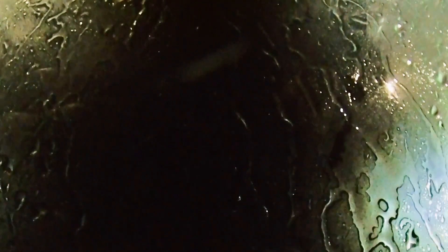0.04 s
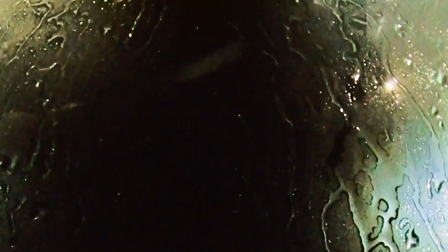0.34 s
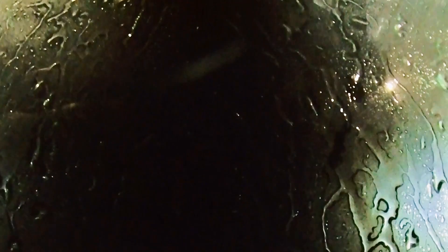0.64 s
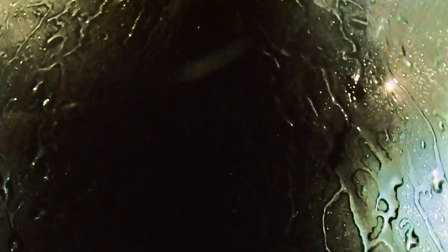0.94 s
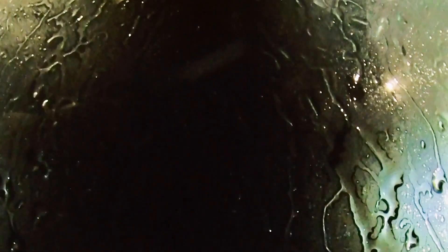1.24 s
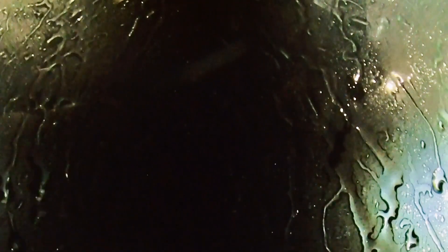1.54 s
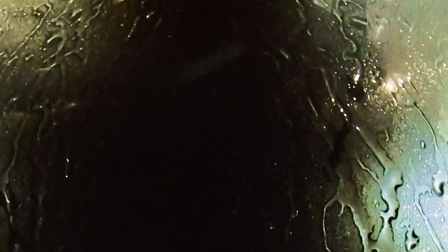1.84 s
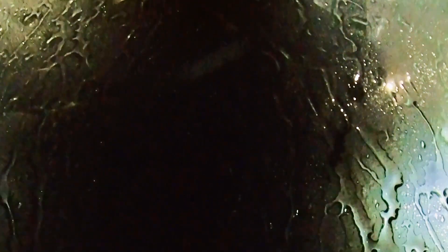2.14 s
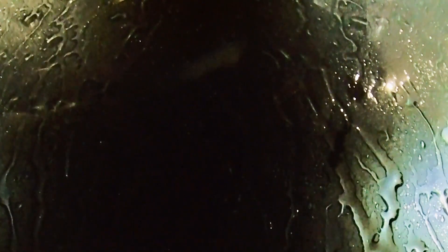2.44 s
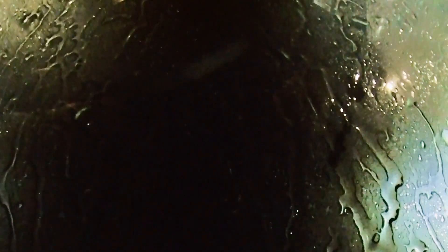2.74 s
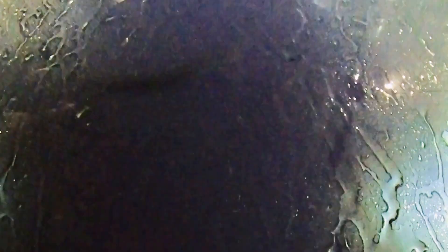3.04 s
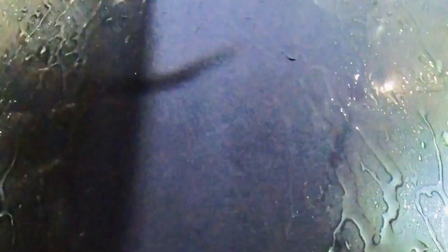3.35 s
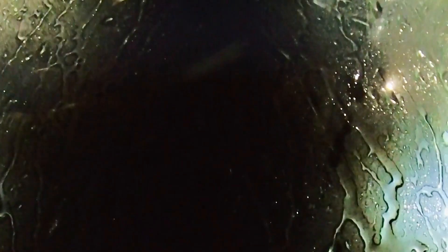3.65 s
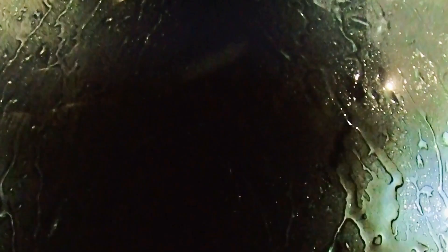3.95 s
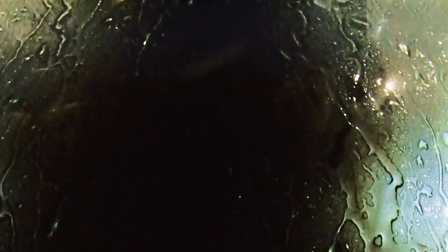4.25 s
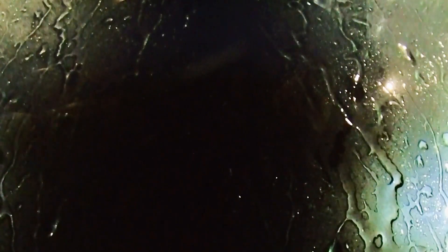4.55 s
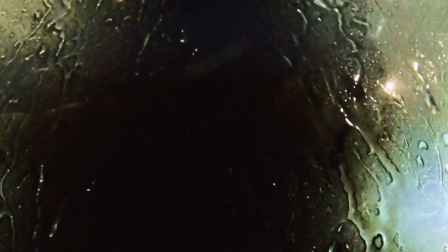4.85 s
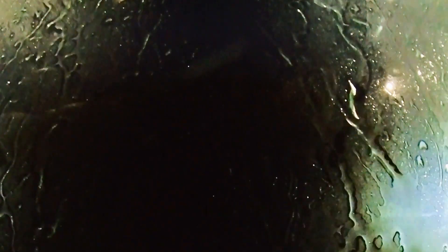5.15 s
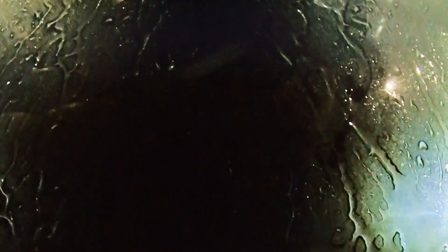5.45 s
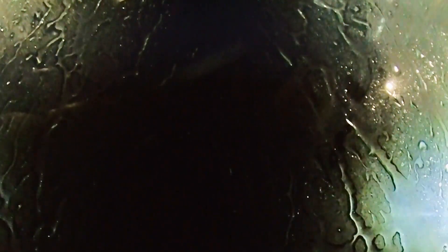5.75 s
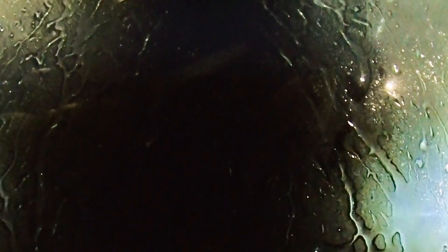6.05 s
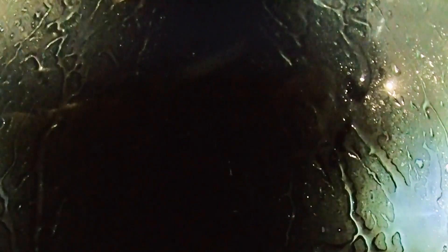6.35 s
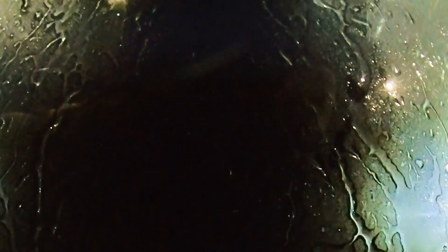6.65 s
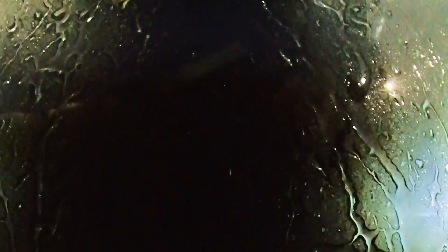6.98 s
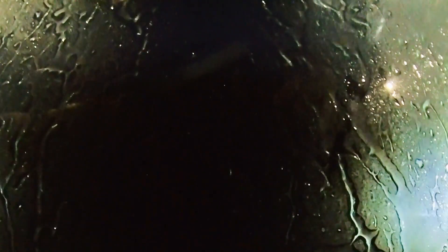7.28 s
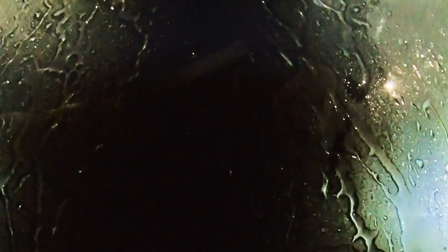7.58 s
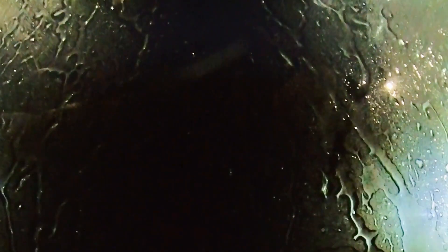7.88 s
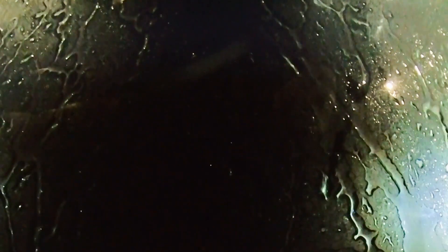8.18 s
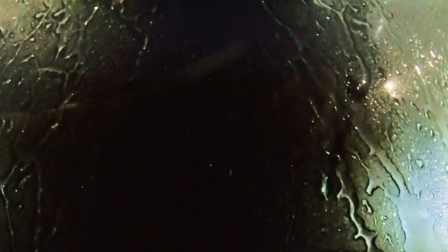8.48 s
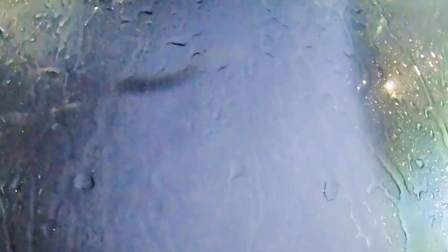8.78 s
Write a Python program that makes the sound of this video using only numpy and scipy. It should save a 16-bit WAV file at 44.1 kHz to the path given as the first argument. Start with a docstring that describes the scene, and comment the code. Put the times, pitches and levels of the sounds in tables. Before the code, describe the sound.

Steady rain is heard from inside a room, close to a window: a soft wash outside, a fine patter and single drops knocking on the glass. After about a second, distant thunder starts a long, low roll and fades. A second roll follows, nearer and louder, with dull claps and thuds. An appliance hums low underneath the whole time.

```python
"""Distant thunder rolls through night rain in two long waves, heard from behind a window.
Shock fronts from along the lightning channel merge into boom, roll and growl; the second wave is nearer,
with claps and more thuds, and a mode of the room booms along. Single drops knock and splash on the pane
amid a fine patter, far rain on roof and ground blurs into a steady wash, and an appliance hums low."""
import sys
import numpy as np
from scipy import signal
from scipy.fft import rfft, irfft, next_fast_len
from scipy.io import wavfile
from scipy.ndimage import map_coordinates

SR = 44100
rng = np.random.default_rng(int(sys.argv[2]) if len(sys.argv) > 2 else 0)


def transcribe(u):
    """Save the signal u as a 16-bit wav file named by the first command-line argument.

    u: samples, shape (n,) or (channels, n), limited to [-1, 1]; the rate is SR.
    q: integer samples, one column per channel.
    """
    v = np.clip(np.atleast_2d(u).T, -1, 1)
    q = np.round(v * 32767).astype(np.int16)
    wavfile.write(sys.argv[1], SR, q)


N = 397782
TIME = np.arange(N) / SR


def amp(db):
    """Decibels to gain."""
    return 10 ** (np.asarray(db) / 20)


def unit(x):
    """x at rms 1."""
    return x / np.sqrt(np.mean(x ** 2) + 1e-20)


def along(points, hz):
    """Read (frequency, value) points on a log frequency axis."""
    freqs, values = np.transpose(points)
    return np.interp(np.log(hz + 1), np.log(freqs + 1), values)


def curves(rows):
    """One automation curve for each column after the time."""
    times, *columns = np.transpose(rows)
    return [np.interp(TIME, times, column) for column in columns]


def wobble(rate):
    """A smooth random curve, rate knots a second."""
    return map_coordinates(rng.standard_normal(int(N * rate / SR) + 4), [TIME * rate])


def filtered(x, response):
    """x through a filter given as a function of frequency."""
    size = x.shape[-1]
    padded = next_fast_len(size + SR // 2)
    return irfft(rfft(x, padded) * response(np.fft.rfftfreq(padded, 1 / SR)), padded)[..., :size]


def coloured(x, spectrum):
    """x through a causal EQ that falls 60 dB an octave past its last point, brought to rms 1."""
    def minimum_phase(hz):
        db = along(spectrum, hz) - 60 * np.log2(np.maximum(hz / spectrum[-1][0], 1))
        cepstrum = irfft(np.log(amp(db) + 1e-6))
        half = len(cepstrum) // 2
        cepstrum[1:half] *= 2
        cepstrum[half + 1:] = 0
        return np.exp(rfft(cepstrum))
    return unit(filtered(x, minimum_phase))


def impacts(rate, spread_db):
    """Randomly timed impulses, rate a second, scattered in size by spread_db; rms 1."""
    size = amp(spread_db * np.clip(rng.standard_normal(N), -2, 2)) * rng.choice([-1, 1], N)
    return unit(size * (rng.random(N) < rate / SR))


def add(track, start_s, sound):
    """Mix a sound into the track at start_s."""
    part = track[max(round(start_s * SR), 0):][:len(sound)]
    part += sound[:len(part)]


def rumble(spectrum, rate, swell_s):
    """Shock fronts from along the lightning channel, dulled by distance; levelled over swell_s."""
    fronts = coloured(impacts(rate, spread_db=3.0), spectrum)
    window = signal.windows.hann(int(2 * swell_s * SR))
    power = signal.fftconvolve(fronts ** 2, window / window.sum(), "same")
    return fronts / np.sqrt(np.abs(power) + 0.041)


# Peal cues, one for each stretch of the lightning channel:
# (start [s], rise [s], hold [s], roll level [dB], boom over roll [dB], growl over roll before trim [dB])
PEAL_CUES = [(1.347, 0.063, 0.14, -42.5, -13, 1), (1.465, 0.22, 0.1, -38.5, 9, -4),
             (1.802, 0.05, 0.11, -40.5, 8, 4), (2.042, 0.051, 0.037, -37.5, -0.5, -3.5),
             (2.436, 0.051, 0.21, -50, 18, 8.5), (2.67, 0.23, 0.39, -33.5, 1, -5.5),
             (3.19, 0.13, 0.13, -36.5, 5.5, -2), (3.534, 0.068, 0.11, -42, 3.5, -7.5),
             (3.884, 0.055, 0.13, -35, -2, -4.5), (4.178, 0.064, 0.17, -38.5, 9.5, 0),
             (4.67, 0.13, 0.065, -55, 11.5, 6.5), (5.734, 0.2, 0.19, -28.5, -2.5, -6.5),
             (6.224, 0.032, 0.22, -30.5, -6.5, -2.5), (6.5, .18, 0.18, -28, -3.5, -3.5),
             (7.006, 0.05, .06, -39, 3.5, 6), (7.11, 0.044, 0.04, -34.5, -6, -4),
             (7.252, 0.023, 0.015, -35.5, 0, 0.5), (7.473, 0.054, 0.08, -36, -3.5, -2),
             (7.785, 0.012, 0.033, -31, 0.5, -2), (7.944, 0.024, 0.14, -39, 0.5, 2.5),
             (8.124, 0.033, 0.24, -40.5, -7, 1), (8.441, 0.022, 0.047, -27.5, -2.5, -2),
             (8.534, 0.028, 0.091, -33, 1.5, -0.5), (8.73, 0.025, 0.037, -35, -15, -1),
             (8.985, 0.067, 0.046, -41.5, -4, 16)]


def peal_envelopes():
    """Gains of roll, boom and growl: each peal swells, holds and dies into its echo off the land."""
    release_s, echo_s, echo_db = 0.64, 4.3, -6  # both times are for a 60 dB fall
    power = np.zeros((3, N))
    for start_s, rise_s, hold_s, db, boom_db, growl_db in PEAL_CUES:
        age = np.maximum(TIME - start_s - rise_s - hold_s, 0)
        fade = amp(-60 * age / release_s) + amp(echo_db - 60 * age / echo_s)
        envelope = np.clip((TIME - start_s) / rise_s, 0, 1) * fade / (1 + amp(echo_db))
        power += (amp([[db], [db + boom_db], [db + growl_db]]) * envelope) ** 2
    return np.sqrt(power)


# The thunder's sub boom, low roll and low-mid growl: (frequency [Hz], level [dB])
BOOM_EQ = [(15, -31), (25, -19), (33, -21.5), (41, 3), (47, -6.5), (56, 3.5), (68, -7), (85, -16.5),
           (120, -45.5), (200, -69.5)]
ROLL_EQ = [(45, -40.5), (75, -18), (92, -1), (106, -7), (128, -1.5), (145, -3.5), (163, -1), (182, -6),
           (205, -5), (235, -16.5), (320, -31.5), (500, -80)]
GROWL_EQ = [(120, -50), (200, -15.5), (240, 1.5), (280, 5), (305, 2), (335, -4), (390, -4.5), (480, -16),
            (650, -28.5), (1200, -54.5)]


def thunder(roll, boom, growl):
    """Far parts of the channel boom, nearer parts roll and growl; claps and thuds add the accents."""
    peals = boom * rumble(BOOM_EQ, rate=400, swell_s=0.041)
    peals += roll * rumble(ROLL_EQ, rate=900, swell_s=0.027)
    peals += amp(-4.0) * growl * rumble(GROWL_EQ, rate=600, swell_s=0.033)
    return peals + claps() + thuds()


# Volleys from the nearest stretches of the channel: (start [s], rise [s], hold [s], level [dB])
CLAP_CUES = [(5.955, 0.013, 0.22, -38.5), (6.271, 0.018, 0.012, -31.5), (6.34, 0.019, 0.033, -36),
             (6.742, 0.023, 0.029, -34.5), (7, 0.012, 0.027, -38), (7.13, 0.023, .03, -38),
             (7.777, .012, .035, -36), (8.55, 0.015, 0.032, -44)]
# Their midrange crack: (frequency [Hz], level [dB])
CLAP_EQ = [(150, -30.5), (270, -1), (340, 7), (400, -1), (455, 0), (560, -11.5), (900, -36.5)]


def claps():
    """The nearest fronts keep their upper range and arrive in dense volleys with a fast attack."""
    release_s = 0.2  # to fall 60 dB
    power = np.zeros(N)
    for start_s, rise_s, hold_s, db in CLAP_CUES:
        attack = np.clip((TIME - start_s) / rise_s, 0, 1)
        age = np.maximum(TIME - start_s - rise_s - hold_s, 0)
        power += (attack * amp(db - 60 * age / release_s)) ** 2
    return np.sqrt(power) * rumble(CLAP_EQ, rate=1200, swell_s=0.017)


# Low pitched thuds in the thunder; the first two are soft booms of the room ringing:
# (start [s], peak level [dB], pitch [Hz], rise [s])
THUD_CUES = [(1.36, -32.5, 156, 0.036), (1.51, -32, 165.6, 0.041), (1.645, -31, 245, 0.024),
             (2.11, -29, 119, 0.021), (2.938, -21.5, 160.6, 0.019), (3.28, -24.5, 47, 0.051),
             (4.0, -26.5, 119, 0.023), (4.26, -27.5, 50, 0.05), (4.371, -25, 59, 0.026),
             (5.918, -25, 136.3, 0.02), (5.994, -21, 139, 0.009), (6.028, -19.5, 134, 0.016),
             (6.157, -26, 174.4, 0.016), (6.25, -26.5, 74, 0.014), (6.287, -27, 345, 0.0097),
             (6.355, -28, 336, 0.022), (6.662, -21, 185, 0.0097), (6.728, -19.5, 199.4, 0.016),
             (6.737, -22.5, 125, 0.023), (6.832, -19, 208, 0.016), (6.84, -21.5, 129.4, 0.022),
             (7.15, -24.5, 149, 0.015), (7.26, -22.5, 89, 0.01), (7.803, -24, 112, 0.0069),
             (7.813, -25, 266, 0.009), (7.856, -29, 74, 0.009), (7.965, -31, 157, 0.013),
             (8.048, -24, 166, 0.013), (8.281, -23.5, 183, 0.0089), (8.464, -22.5, 250, 0.012),
             (8.475, -19, 153, 0.012), (8.508, -20, 137, 0.014), (8.566, -20.5, 286, 0.014),
             (8.592, -22.5, 110.5, 0.017), (8.667, -17, 168, 0.015), (8.708, -24.5, 171, 0.016)]


def thuds():
    """Each thud swells and dies within a few cycles, sinking in pitch, with a short trail of echoes."""
    pitch_sag, trail_db, trail_s = 0.068, -10, 0.072
    out, t = np.zeros(N), np.arange(SR // 3) / SR
    for start_s, db, hz, rise_s in THUD_CUES:
        age = t / rise_s
        turns = np.cumsum(hz * np.exp(pitch_sag * np.tanh(1 - age))) / SR + rng.random()
        knock = (age * np.exp(1 - age)) ** 2 * np.sin(2 * np.pi * turns)
        echoes = rng.standard_normal(len(t)) * amp(-60 * t / trail_s)
        trail = coloured(echoes, [(hz / 4, -20), (hz, 0), (2 * hz, -12)])
        add(out, start_s, amp(db) * (knock + amp(trail_db) * trail / np.abs(trail).max()))
    return out


def room_ring(roll):
    """A narrow standing wave of the room booms along with the roll; later peals ring it less."""
    mode_hz, first_peal_db, fall_db_per_s = 162.8, 3.5, 3.5
    send_db = first_peal_db - fall_db_per_s * (TIME - PEAL_CUES[0][0])
    mode = [(mode_hz * ratio, db) for ratio, db in ((.7, -40), (.9, -10), (1, 0), (1.1, -10), (1.4, -40))]
    return roll * amp(send_db) * rumble(mode, rate=210, swell_s=0.034)


# Big drops on the pane; knock and ping are offsets from the level, all before the trims and EQ:
# (time [s], level [dB], splash length [s], knock [dB], ping [dB], ping pitch [Hz])
DROP_CUES = [(0.9365, -48, .05, 13, -2, 6000), (1.214, -45, 0.091, -12, -2, 5450),
             (1.397, -50, .03, 5, -1, 5380), (2.22, -52, 0.026, 1, -2, 4840),
             (2.358, -51, .05, 4, -7, 3220), (2.376, -46, .09, 2, -12, 3630),
             (3.382, -41, 0.088, 11.5, -8, 5400), (3.414, -44, .07, 8, -5.5, 5350),
             (3.431, -47, 0.045, 15, -9, 5350), (3.472, -47, 0.044, -6, -2.5, 3800),
             (4.069, -46.5, .05, 8, -2.5, 4800), (4.555, -51, .04, 3, -1, 5660),
             (4.575, -47, .04, 3, -5, 5460), (5.7447, -42, .055, -2, -5, 3550),
             (6.1493, -46.5, .07, 15, -5, 5950), (6.568, -45, .09, 12, -7, 5850),
             (6.591, -43.5, .055, 5, -5, 4600), (6.619, -51, .04, 6, -4, 4610),
             (6.689, -47, 0.05, 3, -8, 5250), (6.946, -45, .09, 9, -6, 3350),
             (7.073, -47, 0.038, 13, -2, 4750), (7.418, -44.5, 0.083, 4, -8.5, 6330),
             (7.463, -42, 0.064, 8, -11, 4650), (7.817, -44.5, 0.044, 5, -2, 5600),
             (8.058, -38.5, .07, 7.5, -5.5, 6150), (8.137, -47, 0.078, 0, -3.5, 5900),
             (8.186, -45, .012, 0, -4, 5500), (8.279, -50, .03, -2, 7.5, 4930)]
# Resonances of the pane: (frequency [Hz], bandwidth [Hz], level [dB])
PANE_MODES = [(1028, 33, 3.5), (1380, 330, -9), (2060, 63, -16), (2410, 110, -25.5), (2950, 360, -19)]
# The bright splash, and the glass dulling the whole drop: (frequency [Hz], level [dB])
SPLASH_EQ = [(1000, -5), (2500, 6.5), (4000, 1), (5200, 6), (6600, 3.5), (7500, -6), (8500, -14),
             (9700, -24)]
THROUGH_GLASS_EQ = [(6500, -1.5), (8000, -0.5), (9600, -14)]


def drops():
    """A big drop knocks the glass and bursts into a short splash with a ping of its own pitch."""
    flatten_s, knock_s, ping_band_hz = 0.0028, 0.082, 1500
    out, t = np.zeros(N), np.arange(SR // 6) / SR

    def burst(decay_s):
        attack = 1 - np.exp(-t / flatten_s)
        return rng.standard_normal(len(t)) * attack * amp(-60 * (t / decay_s) ** 1.5)

    def resonance(hz, centre, width):
        return 1j * hz * width / (centre ** 2 - hz ** 2 + 1j * hz * width)

    def pane(hz):
        return sum((-1) ** k * amp(db) * resonance(hz, centre, width)
                   for k, (centre, width, db) in enumerate(PANE_MODES))

    for start_s, db, length_s, knock_db, ping_db, ping_hz in DROP_CUES:
        splash = coloured(burst(length_s), SPLASH_EQ)
        knock = filtered(burst(knock_s), pane)
        ping = filtered(burst(0.7 * length_s), lambda hz: resonance(hz, ping_hz, ping_band_hz) ** 3)
        for part, part_db in ((splash, -2.5), (knock, knock_db - 7.0), (ping, ping_db)):
            add(out, start_s, amp(db + part_db) * part / np.abs(part).max())
    return filtered(out, lambda hz: amp(along(THROUGH_GLASS_EQ, hz)))


# Tone of the smaller drops: (frequency [Hz], level [dB])
TAP_EQ = [(500, -7), (1000, 6), (2000, 3.5), (3000, 7), (4400, 0.5), (6500, 0), (7500, -10.5), (9500, -31)]


def taps():
    """Smaller drops splash on the pane in random clusters, each a short puff of noise."""
    taps_per_s, rise_s, decay_s = 55, 0.0036, 0.018
    crowding = amp(3 * wobble(9))
    hits = rng.random(N) < taps_per_s * crowding / crowding.mean() / SR
    sizes = hits * rng.random(N)
    t = np.arange(SR // 8) / SR
    envelope = np.exp(-t / decay_s) * (1 - np.exp(-t / rise_s))
    power = signal.fftconvolve(sizes ** 2, envelope ** 2)[:N]
    return amp(-65) * coloured(np.sqrt(np.abs(power)) * rng.standard_normal(N), TAP_EQ)


def drips(rate, centre_hz, spread, cycles, spread_db):
    """Small drops on wet surfaces: each rings briefly at its own pitch."""
    count = int(rate * N / SR)
    when, start_turn = rng.random((count, 2)).T
    pitch, life, size = np.clip(rng.standard_normal((count, 3)), -2, 2).T
    hz = np.minimum(centre_hz * np.exp(spread * pitch), SR / 3)[:, None]
    samples = np.arange(SR // 60)
    turns = hz * samples / SR
    age = turns / (cycles * np.exp(life / 2))[:, None]
    envelopes = amp(spread_db * size)[:, None] * np.exp(-age) * (1 - np.exp(-10 * age))
    rings = envelopes * np.sin(2 * np.pi * (turns + start_turn[:, None]))
    positions = (when * N).astype(int)[:, None] + samples
    return unit(np.bincount(positions.ravel(), rings.ravel(), N)[:N])


# Strength of the rain, before each layer's trim: (time [s], wash level [dB], patter level [dB])
RAIN_FADERS = [(0, -48.5, -60.5), (1.3, -50.5, -64), (3.3, -48.5, -62), (5.2, -49, -61), (7.4, -47, -61.5),
               (9, -49, -61.5)]
# Pitches that the wet pane favours: (pitch [Hz], level within the patter [dB])
PANE_TINKS = [(2880, -17.5), (4700, -17), (5300, -14.5), (6350, -14)]
# Sizzle of the near rain: (frequency [Hz], level [dB])
PATTER_EQ = [(800, -10.5), (2000, -2.5), (3100, -2.5), (3700, -4.5), (4400, -6.5), (5200, -5.5),
             (5750, -4.5), (6350, -4), (6900, -4), (7400, -10.5), (8200, -19), (9000, -26.5), (9700, -37.5)]


def patter(flurry_db):
    """Near drops tick and ping on the wet pane and sill over a fine spray."""
    _, level_db = curves(RAIN_FADERS)
    pings = drips(rate=900, centre_hz=5500, spread=.22, cycles=16, spread_db=2.4)
    tinks = sum(amp(db) * drips(rate=130, centre_hz=hz, spread=.025, cycles=30, spread_db=2.4)
                for hz, db in PANE_TINKS)
    ticks = impacts(450, spread_db=3.5)
    spray = impacts(9000, spread_db=2)
    fizz = tinks + .52 * pings + .33 * ticks + .8 * spray
    return amp(level_db + 0.57 + flurry_db) * coloured(fizz, PATTER_EQ)


# Far rain through the wall, its low drumming and its watery mids: (frequency [Hz], level [dB])
DRUMMING_EQ = [(18, -23), (30, -6.5), (45, 5), (72, 1.5), (92, -0.5), (120, 1), (165, 3), (200, 0.5),
               (270, -1), (295, -5.5), (345, -1), (430, -8.5), (500, -5.5), (800, -37.5)]
WASH_EQ = [(250, -23), (420, 0.5), (520, 4.5), (680, 4.5), (920, 0), (1035, 2), (1140, -7.5), (1350, -5),
           (1600, -8), (2000, -15), (2350, -14.5), (2650, -18.5), (2880, -17), (3600, -27.5)]


def wash():
    """Countless far drops drum on roof and ground and merge into a wash; nearer ones plop through it."""
    level_db, _ = curves(RAIN_FADERS)
    drumming = amp(-40.5 + 0.56 * wobble(6.7)) * coloured(impacts(2500, spread_db=2.5), DRUMMING_EQ)
    plops = drips(rate=700, centre_hz=2000, spread=.35, cycles=4, spread_db=3)
    water = impacts(2600, spread_db=0) + 0.15 * plops
    flutter_db = 0.65 * wobble(24) + 0.65 * wobble(15)
    return drumming + amp(level_db + 2.5 + flutter_db) * coloured(water, WASH_EQ)


def hum(mains_hz=60):
    """An appliance in the house hums at mains pitch, slightly unsteady."""
    phase = 2 * np.pi * mains_hz * TIME + .1 * wobble(3)
    return amp(-40.5 + .5 * wobble(3.9)) * np.sin(phase)


# Stereo width, open only in the hiss band: (frequency [Hz], side gain [dB])
SIDE_EQ = [(2950, -69), (3100, -0.5), (6150, -6.5), (6350, -63.5)]


def scene():
    """Everything sits centre, but the patter and a little of the drops spread across the window."""
    flurry_db = 0.33 * wobble(60) + 0.64 * wobble(10)
    roll, boom, growl = peal_envelopes()
    rain = wash() + patter(flurry_db) + taps() + drops()
    mid = rain + thunder(roll, boom, growl) + room_ring(roll) + hum()
    side = filtered(patter(flurry_db) + amp(-12.0) * drops(), lambda hz: amp(along(SIDE_EQ, hz)))
    return np.array([mid + side, mid - side])


def record(dry):
    """A brick-wall high cut at 9600 Hz takes the air off the mix."""
    return filtered(dry, lambda hz: hz < 9600)


dry = scene()
out = record(dry)
transcribe(out)
```